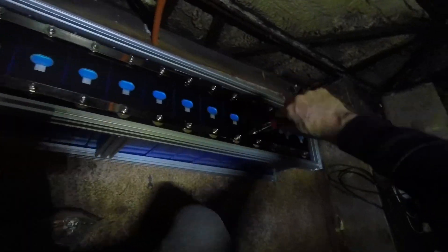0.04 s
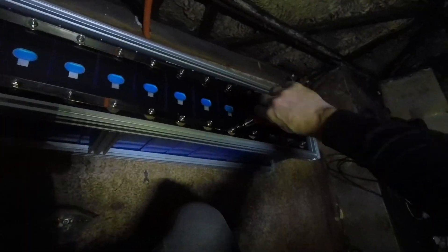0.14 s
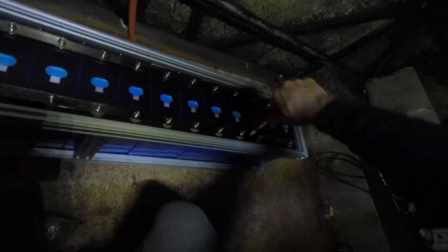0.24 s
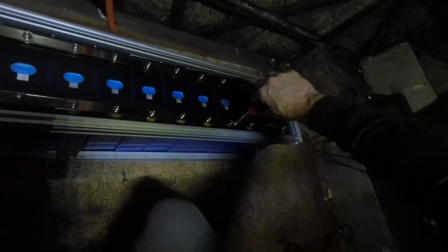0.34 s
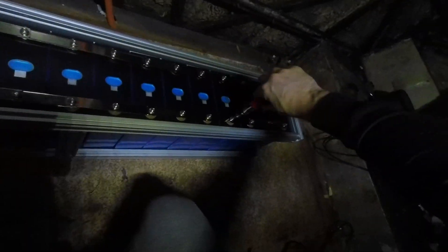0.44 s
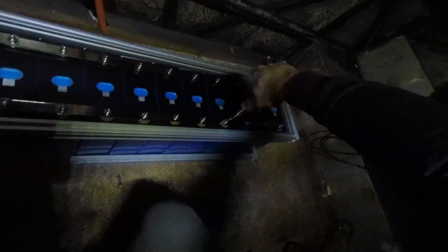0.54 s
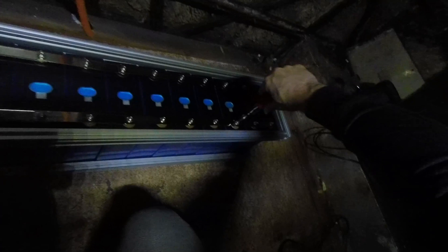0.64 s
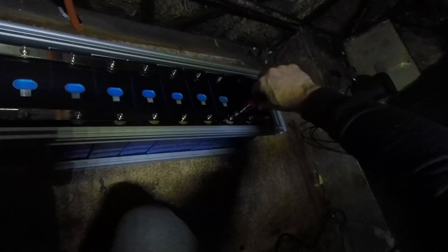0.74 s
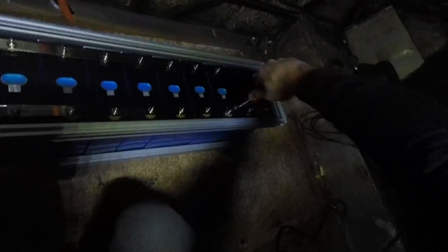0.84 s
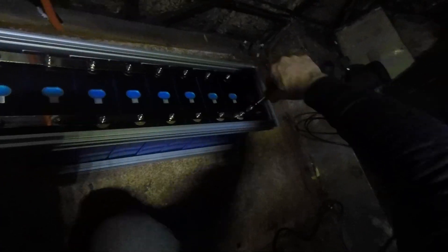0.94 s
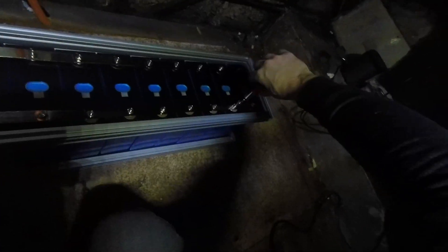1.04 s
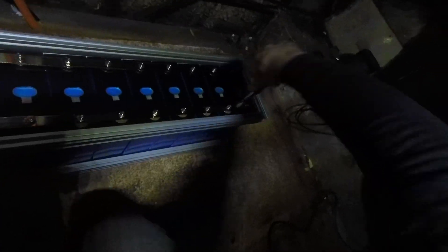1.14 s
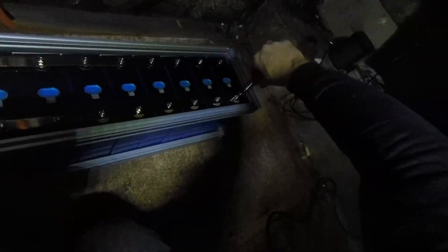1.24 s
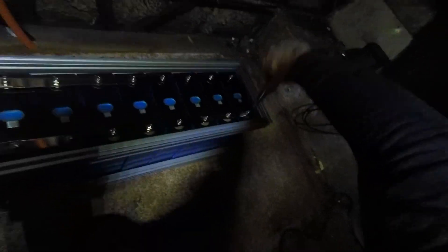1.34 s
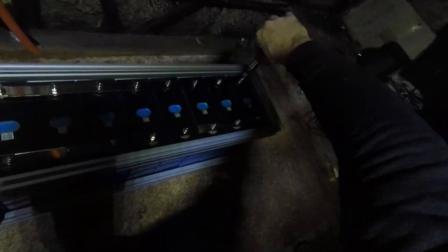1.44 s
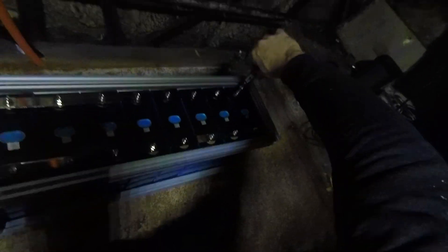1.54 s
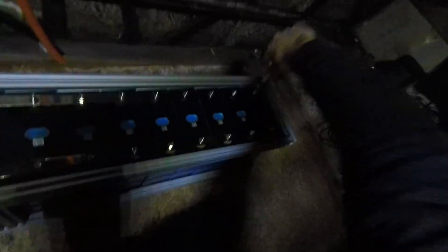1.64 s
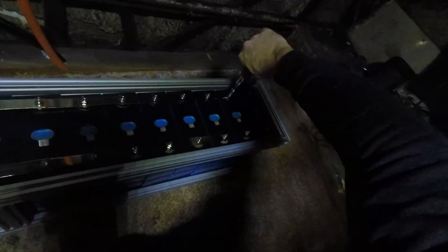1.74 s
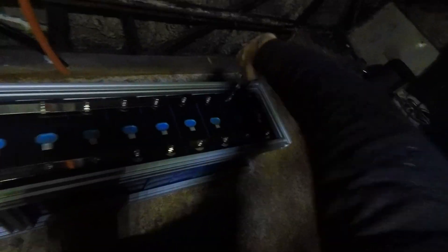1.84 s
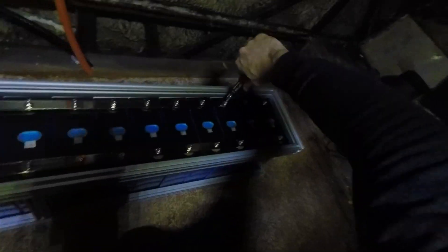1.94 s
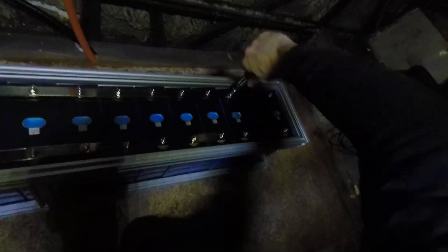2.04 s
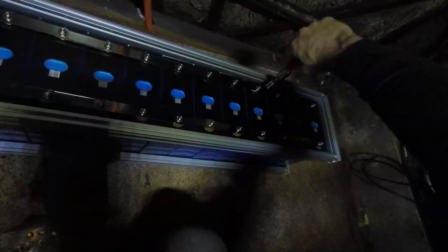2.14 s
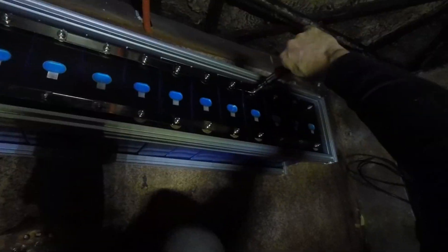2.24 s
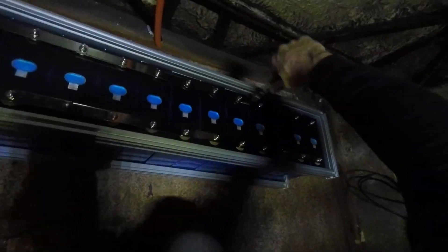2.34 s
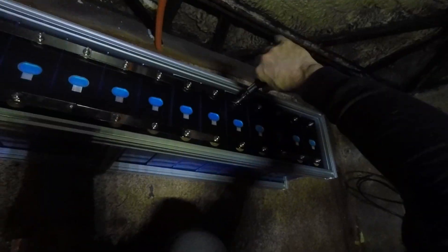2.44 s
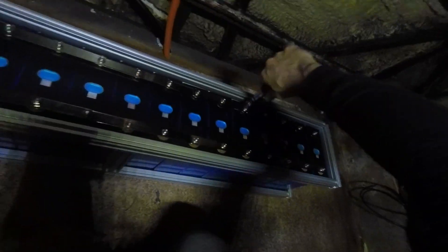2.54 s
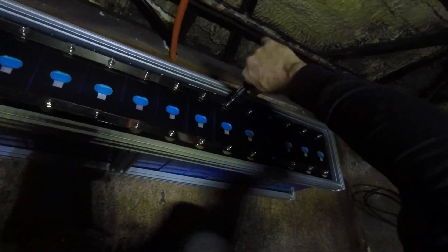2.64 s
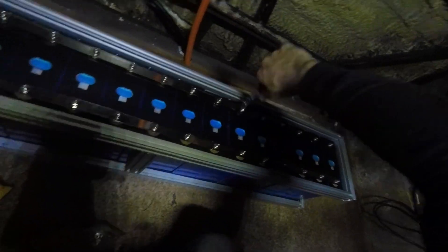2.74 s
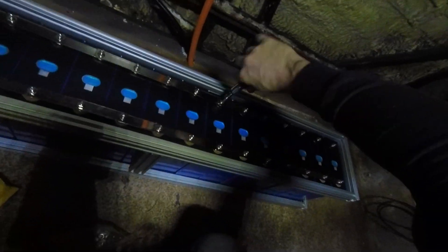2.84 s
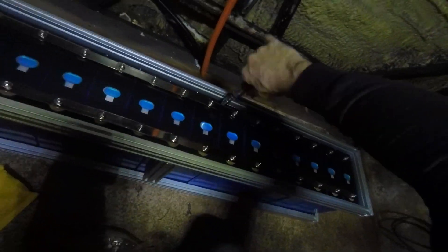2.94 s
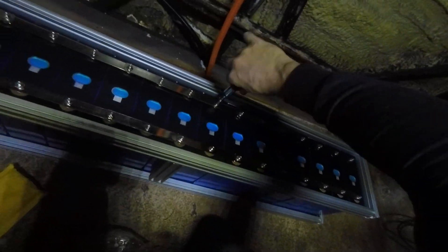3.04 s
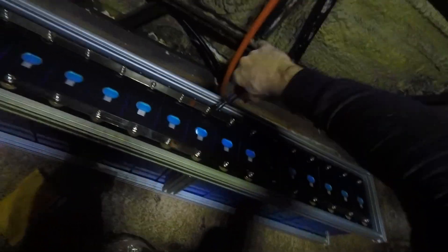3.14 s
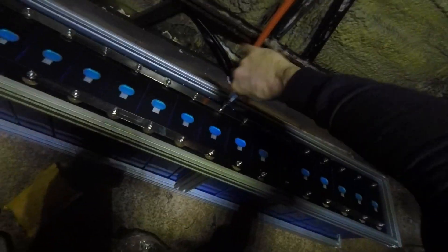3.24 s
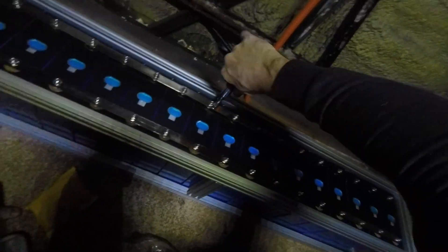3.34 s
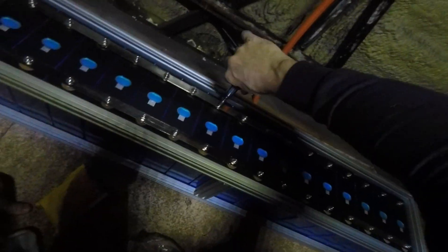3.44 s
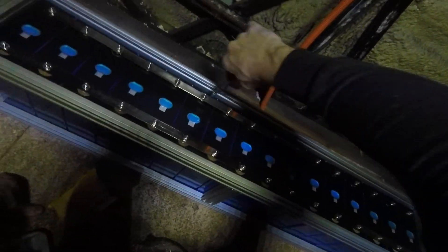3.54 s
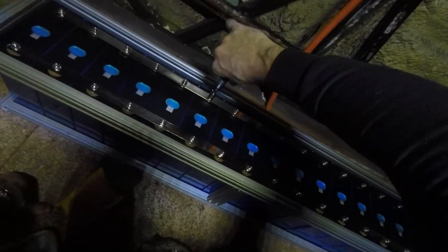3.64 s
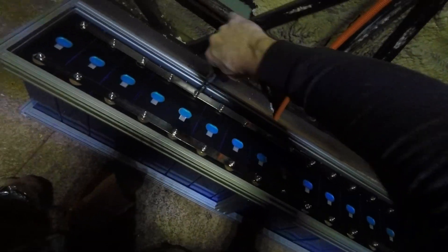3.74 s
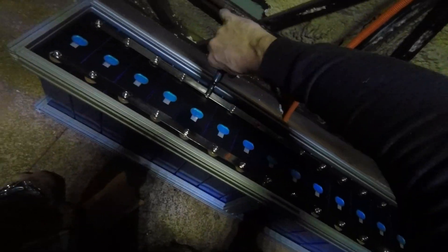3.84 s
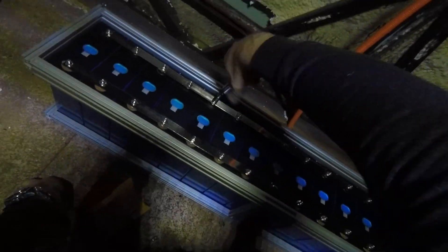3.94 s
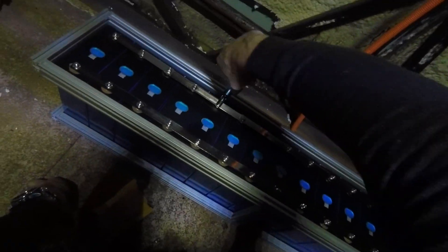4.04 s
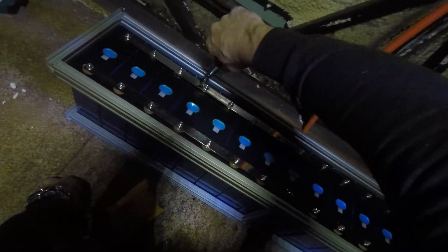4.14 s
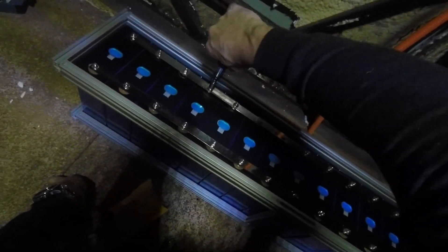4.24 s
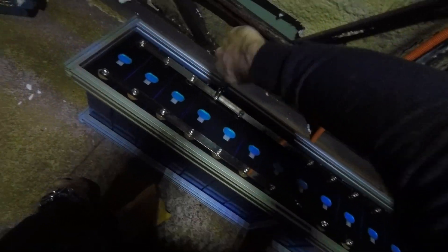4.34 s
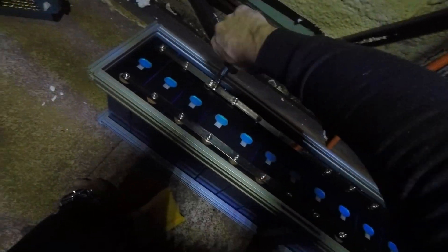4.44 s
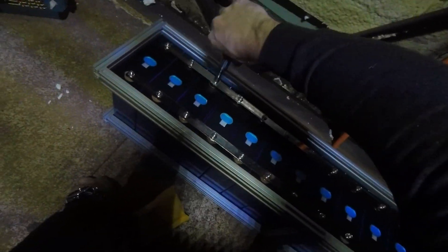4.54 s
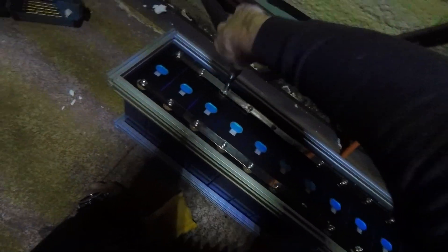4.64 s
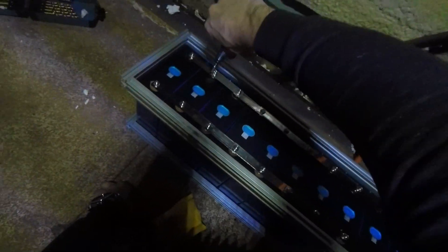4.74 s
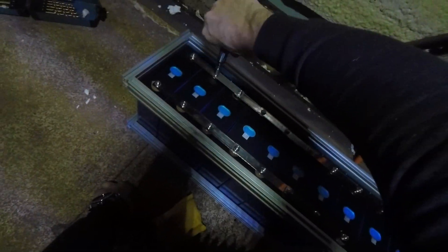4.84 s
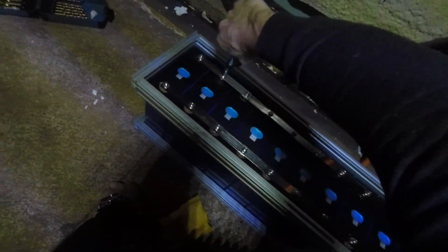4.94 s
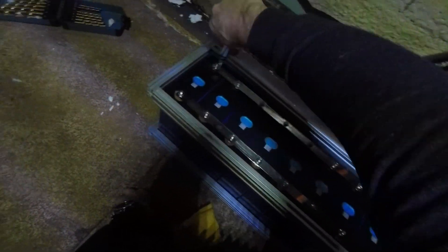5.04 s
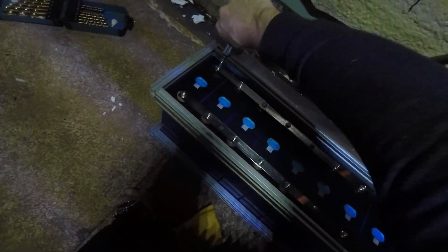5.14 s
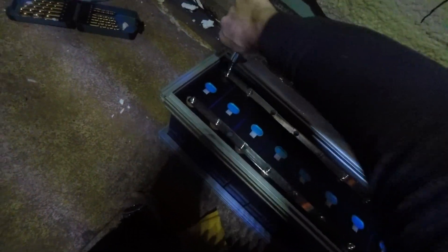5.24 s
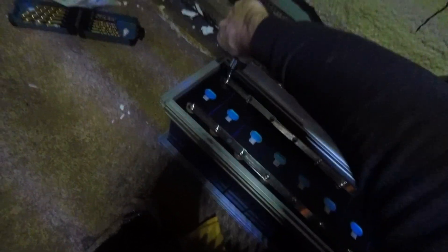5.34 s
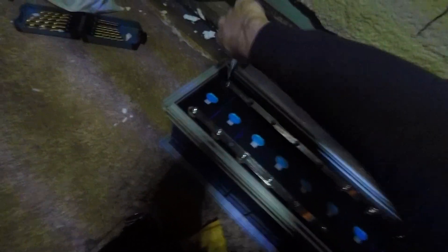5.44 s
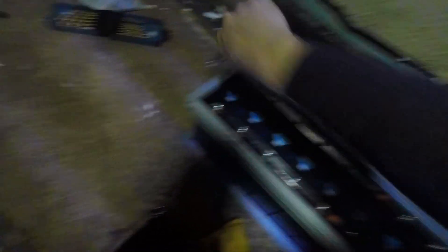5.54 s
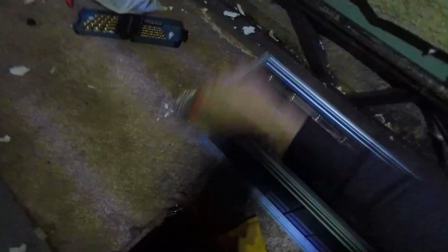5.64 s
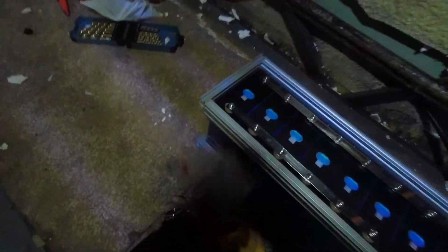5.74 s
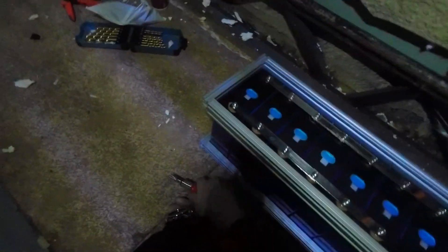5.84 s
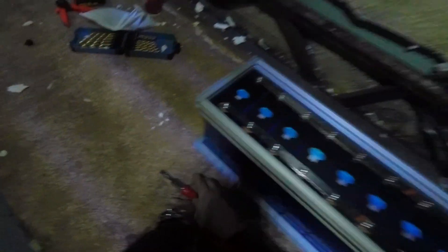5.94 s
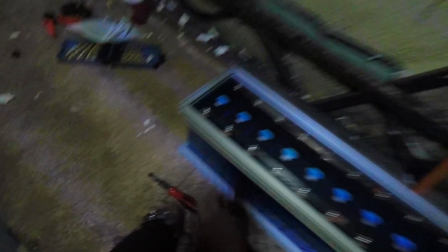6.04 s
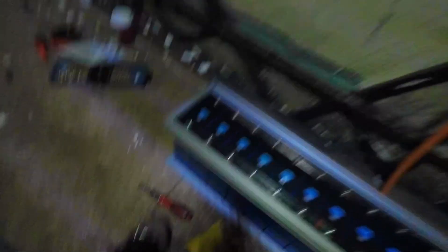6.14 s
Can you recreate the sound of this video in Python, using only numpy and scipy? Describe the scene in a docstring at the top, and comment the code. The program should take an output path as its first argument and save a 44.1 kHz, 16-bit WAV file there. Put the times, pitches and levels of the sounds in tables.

```python
"""Ratchet on a battery bank

A small hand ratchet swings back and forth on the terminal nuts: its pawl (the catch) and loose socket
click unevenly, and one joint creaks as it takes the load. A sleeve rustles, then something heavy knocks
against the case. The body-worn camera lets in more bass shortly before the knock, and its limiter
turns the sound down under the blow."""
import sys
import numpy as np
from scipy import signal
from scipy.fft import rfft, irfft, next_fast_len
from scipy.io import wavfile
from scipy.ndimage import uniform_filter1d, minimum_filter1d

SR = 44100
rng = np.random.default_rng(int(sys.argv[2]) if len(sys.argv) > 2 else 0)


def dump_mix(stems):
    """Bounce the given channels to the path in sys.argv[1] as a 16-bit WAV at rate SR."""
    frames = np.atleast_2d(stems).T  # one column per channel
    limited = np.clip(frames, -1, 1)  # hard clip at full scale
    pcm = np.round(limited * 32767).astype(np.int16)
    wavfile.write(sys.argv[1], SR, pcm)


N = 273670
TIME = np.arange(N) / SR
BASS_OPENS_S = 5.265


def from_db(db):
    """Turn decibels into a number to multiply by."""
    return 10 ** (np.asarray(db) / 20)


def rms_one(x):
    """Scale a sound so that its average strength (rms) is 1."""
    return x / np.sqrt(np.mean(x ** 2) + 1e-20)


def at_hz(points, hz):
    """Read between a table's rows, with octaves evenly spaced."""
    f, value = np.transpose(points)
    return np.interp(np.log(np.maximum(hz, 1)), np.log(f), value)


def add(out, s, sound):
    """Mix a sound in, starting at s seconds."""
    i = int(round(s * SR))
    out[i:i + len(sound)] += sound[:max(N - i, 0)]


def keep(x, hz, kind, order=2):
    """Keep the "low" side, the "high" side or a "band" of a sound."""
    sos = signal.butter(order, np.minimum(hz, .49 * SR), kind, fs=SR, output="sos")
    return signal.sosfilt(sos, x + 1e-18)


def noise(colour):
    """Steady noise with a given mix of bass and treble, rms 1."""
    size = next_fast_len(N)
    gain = from_db(at_hz(colour, np.arange(size // 2 + 1) * SR / size))
    return rms_one(irfft(rfft(rng.standard_normal(size)) * gain, size)[:N])


def resonate(x, tones, detune=0., vary_db=0.):
    """Ring an object's own tones; their pitch and strength can vary by chance."""
    out = 0
    for k, (hz, width, db) in enumerate(tones):
        decay = np.exp(-np.pi * width / SR)
        angle = 2 * np.pi * hz * (1 + detune * rng.normal()) / SR
        gain = (-1) ** k * from_db(db + vary_db * rng.normal()) * (1 - decay ** 2) / 2
        feedback = [1, -2 * decay * np.cos(angle), decay ** 2]
        out = out + gain * signal.lfilter([1, 0, -1], feedback, x + 1e-18)
    return out


# colours of the hush, the dull rubbing and the bright sliding: f/Hz, level/dB
HUSH_COLOUR = [(30, -26), (110, 13), (180, 17.5), (350, -4), (600, 0.5), (1000, -5.5), (2200, -12),
               (4300, -31), (7000, -10), (10000, -15.5), (12500, -24.5), (16000, -34)]
RUB_COLOUR = [(100, -8.5), (400, -9.5), (800, 3), (1150, -1.5), (1650, -5.5), (2200, -9.5), (3200, -15),
              (4500, -21), (9000, -47)]
SLIDE_COLOUR = [(1500, -20), (3200, 1), (4500, 0), (7000, -0.5), (10000, -3), (12500, -7.5), (15000, -9),
                (17000, -10)]
# the hand shifts its grip: middle t/s, half length/s, extra rubbing/dB, extra sliding/dB
GRIP_SHIFTS = [(.63, 0.083, 5, 2), (1.212, 0.22, 0.5, 1.5), (3.16, .13, 1, 5.5), (4.384, 0.11, 0.5, 1.5)]

def background():
    """Hand and cloth hiss on the handle; a hollower hush takes over once the bass is let in."""
    rub_db, slide_db = -50.5, -58.5
    for s, half_length, extra_rub_db, extra_slide_db in GRIP_SHIFTS:
        swell = np.exp(-((TIME - s) / half_length) ** 2)
        rub_db += extra_rub_db * swell
        slide_db += extra_slide_db * swell
    waver = rms_one(keep(rng.standard_normal(N), 22, "low"))
    rubbing = from_db(rub_db + 1.83 * waver) * noise(RUB_COLOUR)
    sliding = from_db(slide_db) * noise(SLIDE_COLOUR)
    hush = from_db(-46.5) * noise(HUSH_COLOUR)
    return np.where(TIME < BASS_OPENS_S, rubbing + sliding, hush)


def stroke(start_s, length_s, rise_s=.02, fade_s=0.033):
    """Loudness of one sleeve movement: rise, hold, then die away."""
    t = TIME - start_s
    return np.clip(t / rise_s, 0, 1) * np.exp(-np.maximum(t - length_s, 0) / fade_s)


# colour of the rustle: f/Hz, level/dB
SLEEVE_COLOUR = [(60, -25), (130, -2.5), (190, -11.5), (340, -3), (500, -13.5), (800, -19.5), (1300, -18),
                 (2500, -21), (5000, -32), (9000, -46)]
# the sleeve presses on the case: t/s, length/s, level/dB
SLEEVE_PRESSES = [(5.432, 0.06, -39.5), (5.512, 0.54, -46)]
# tones of the rubbed case: f/Hz, width/Hz, level/dB
RUBBED_TONES = [(1130, 56, -4.5), (1634, 100, 3.5), (3350, 210, -15), (4730, 190, -12.5)]

def sleeve():
    """Cloth drags in small uneven catches and, when pressed, rings the case."""
    drag = from_db(-51) * stroke(start_s=5.25, length_s=0.8)
    pressed = sum(from_db(db) * stroke(s, length) for s, length, db in SLEEVE_PRESSES)
    catches = rms_one(keep(rng.standard_normal(N), 47, "low"))
    ring = from_db(-5) * pressed * rms_one(resonate(rng.standard_normal(N), RUBBED_TONES))
    rustle = np.hypot(drag, pressed) * noise(SLEEVE_COLOUR)
    return from_db(0.78 * catches) * (rustle + ring)


# colour of the echo: f/Hz, level/dB
ECHO_COLOUR = [(60, -34), (130, -10.5), (250, 12), (600, 0.5), (1300, -8.5), (2500, -8), (5000, -18),
               (12000, -26)]
# how long it lasts: f/Hz, time to fade by 60 dB/s
ECHO_FADES = [(130, 0.36), (400, 0.19), (1500, 0.32), (4000, 0.2), (10000, .15)]

def workspace_echo():
    """The workspace answers a knock with a blur of echoes, the highest dying first."""
    t, echo = TIME[:SR // 2], 0
    for hz in 90 * 2 ** (np.arange(15) / 2):   # half-octave steps
        band = keep(rng.standard_normal(len(t)), [hz / 2 ** .25, hz * 2 ** .25], "band")
        echo += band * from_db(at_hz(ECHO_COLOUR, hz) - 60 * t / at_hz(ECHO_FADES, hz))
    echo *= np.minimum(t / 0.016, 1)
    return echo / np.linalg.norm(echo)


# blows on the case and its rocking afterwards: t/s, level/dB, dulled above f/Hz
KNOCKS = [(5.8814, 3.5, 3000), (5.883, 10.5, 340), (5.8983, 11, 1900), (5.9265, 5.5, 550), (5.9452, 2, 350),
          (5.974, 0.5, 262), (6.0051, 1.5, 148), (6.0494, -17, 250), (6.1104, -7, 170)]
# tones of the whole case: f/Hz, level/dB, time to fade by 60 dB/s
KNOCK_TONES = [(146.7, -32.5, 0.6), (189.7, -1.5, 0.08), (240.7, -21, 0.21), (274, -27.5, 0.12),
               (318, -33.5, 0.24), (378, -17.5, 0.064), (456, -11, 0.025), (575, -20, 0.06),
               (690, -13, 0.03), (800, -6.5, 0.012), (950, -9.5, 0.012), (1175, -9, 0.0097),
               (1275, -17.5, 0.024), (1350, -13.5, 0.021), (1726, -24, 0.071), (2300, -19, 0.016),
               (3150, -10, 0.01), (5620, -3, 0.0098), (8200, -14, 0.024)]

def knock():
    """A hard double blow rings the case, then softer bumps follow as it settles."""
    t, out = TIME[:SR // 2], np.zeros(N)
    body = sum(from_db(db - 60 * t / fade_s) * np.sin(2 * np.pi * hz * t)
               for hz, db, fade_s in KNOCK_TONES)
    for s, db, bright_hz in KNOCKS:
        crack = from_db(-3 - 60 * t / 0.031) * rng.standard_normal(len(t))
        blow = body + keep(crack, 7400, "low")
        add(out, s, from_db(db) * keep(blow, bright_hz, "low"))
    echo = signal.oaconvolve(keep(out, 403, "high"), workspace_echo())[:N]
    return out + from_db(-11.5) * echo


# faint squeaks during the creak: t/s, length/s, first f/Hz, last f/Hz, level/dB
SQUEAKS = [(0.54, 0.034, 8500, 11500, -45.5), (0.635, .035, 11000, 13300, -51),
           (0.632, 0.057, 7740, 11000, -46)]

def squeaks():
    """The dry screw thread whistles upward, unsteadily, as it is loaded."""
    out = np.zeros(N)
    for s, length, start_hz, end_hz, db in SQUEAKS:
        along = np.linspace(0, 1, int(length * SR))
        glide_hz = start_hz + (end_hz - start_hz) * np.sqrt(along)
        jitter_hz = 1500 * rng.standard_normal(len(along))
        whistle = np.sin(2 * np.pi * np.cumsum(glide_hz + jitter_hz) / SR)
        add(out, s, from_db(db) * np.sin(np.pi * along) * whistle)
    return out


# bursts of creaking: t/s, length/s, slip rate f/Hz, level/dB, unevenness from 0 to 1
CREAKS = [(0.524, 0.019, 200, -28, 0.2), (0.544, .027, 505, -25, 0.05), (0.603, .034, 262, -27.5, .06),
          (.638, .044, 460, -30, .2)]
# tones that each slip rings: f/Hz, width/Hz, level/dB
CREAK_TONES = [(800, 540, -1), (1010, 213, 3.5), (1207, 150, 0), (1526, 197, -1), (1980, 400, -21.5),
               (2650, 570, -30)]

def creak(rise_s=0.0034, fade_s=0.0097, slowing=.22):
    """The joint sticks and slips, slowing as the load takes hold; fast slips blend into a squeal."""
    slips = np.zeros(N)
    for start, length, slip_hz, db, uneven in CREAKS:
        t = 0
        for gap, size in rng.standard_normal((40, 2)):
            swell = np.clip(min((t + 1 / slip_hz) / rise_s, (length - t) / fade_s), 0, 1)
            rate = slip_hz * (1 - slowing * min(t / length, 1) ** 3)
            slips[int((start + t) * SR)] = swell * from_db(db + 9 * uneven * size) * np.sqrt(SR / rate)
            t += np.exp(uneven * gap) / rate
    tap = 1. * (TIME[:SR // 20] == 0)
    body = keep(resonate(tap, CREAK_TONES), 2200, "low", order=3)
    return from_db(1.5) * signal.oaconvolve(slips, body / np.linalg.norm(body))[:N]


def favour(tones, centre_hz, db_per_octave):
    """The spot that is hit rings the tones near one pitch hardest."""
    return [(hz, width, db - db_per_octave * abs(np.log2(hz / centre_hz))) for hz, width, db in tones]


def snap(tones, band_hz, rattle_db, rattle_s, room_db, room_s):
    """One part rings from a hit, a short rattle of loose steel and a faint room echo."""
    t = TIME[:SR // 14]
    fade = from_db(rattle_db - 60 * t / rattle_s) + from_db(room_db - 60 * t / room_s)
    force = (t == 0) + fade * rng.standard_normal(len(t))
    ring = resonate(force, tones, detune=0.014, vary_db=3.5)   # varies with the grip
    ring = keep(ring, band_hz, "band")
    return ring / np.sqrt(np.mean(ring[:SR // 100] ** 2))   # rms 1 over the first 10 ms


# tones of the four parts that a click rings: f/Hz, width/Hz, level/dB
CASE_TONES = [(750, 93, 11.5), (900, 465, -1), (1092, 80, 2), (1620, 1350, 2)]
HANDLE_TONES = [(2150, 254, -10), (2320, 390, -9), (3164, 395, 2.5), (3326, 330, 1.5), (3710, 880, -14)]
SOCKET_TONES = [(4720, 220, -1.1), (5420, 1180, -1.1), (6800, 970, 0.35), (8000, 730, 1), (9090, 1160, 2.2),
                (10300, 1600, 0.97)]
PAWL_TONES = [(11500, 800, -0.5), (14400, 4000, 1.2), (15430, 2700, 1.3)]
# the socket rings brighter on the later nuts: t/s, favoured f/Hz
SOCKET_PITCH = [(0, 6500), (1.5, 6000), (2.7, 7200), (5.25, 7730)]

def click(s, case_db, handle_db, pawl_db, case_hz):
    """One click rings the tool and, through the terminal, the battery case."""
    socket_hz = np.interp(s, *np.transpose(SOCKET_PITCH))
    case = snap(favour(CASE_TONES, case_hz, db_per_octave=26), [460, 3600],
                rattle_db=-30, rattle_s=0.019, room_db=-26.5, room_s=0.052)
    handle = snap(HANDLE_TONES, [1060, 5600], rattle_db=-24, rattle_s=0.04, room_db=-43, room_s=0.059)
    socket = snap(favour(SOCKET_TONES, socket_hz, db_per_octave=10), [3600, 10060],
                  rattle_db=-22.5, rattle_s=0.031, room_db=-44.5, room_s=0.091)
    pawl = snap(PAWL_TONES, [10300, 17600], rattle_db=-23, rattle_s=0.022, room_db=-56, room_s=.07)
    return (from_db(case_db + 0.87) * case + from_db(handle_db - 0.36) * handle
            + from_db(0.05) * socket + from_db(pawl_db - 0.4) * pawl)


def loose_ticks(clicks, chance=.45, soonest_s=.005, latest_s=0.033, weaker_db=13):
    """Slack in the tool adds a weaker tick after some clicks."""
    return [(s + soonest_s + (latest_s - soonest_s) * delay, db - weaker_db, *colour)
            for (s, db, *colour), (dice, delay) in zip(clicks, rng.random((len(clicks), 2)))
            if dice < chance]


def stray_ticks(until_s, per_s=7, case_db=-2, handle_db=-9.5, pawl_db=-5.5, case_hz=960):
    """Stray teeth slip at random moments between the clicks."""
    times = np.cumsum(rng.exponential(1, size=80)) / per_s
    levels_db = rng.normal(-50.5, 4, size=80)
    return [(s, db, case_db, handle_db, pawl_db, case_hz)
            for s, db in zip(times, levels_db) if s < until_s]


# the clear clicks: t/s, level/dB, case boost/dB, handle boost/dB, pawl boost/dB, case f/Hz
CLICKS = [(0.0993, -44, -10, 3.5, -10, 850), (0.105, -42.5, -8, -6, -9, 850),
          (0.124, -53, 9.5, -5, 3, 1190), (0.1406, -46, 4, 2, -7, 860), (0.3007, -39.5, 1, 6.5, -13, 1160),
          (0.318, -36, -2, 3, -8, 880), (0.3283, -38.5, -2, 2.5, -9, 960), (0.3464, -44, -10, -5, -4, 1200),
          (0.351, -38.5, -9, -12, -2, 1040), (0.4146, -39, -7, 0.5, -9, 990),
          (0.4245, -42.5, -5, 0, -7, 900), (0.4493, -47, -7, 3, -6, 1260), (0.488, -34, -2, 4.5, -9, 880),
          (0.6712, -43.5, 12, 4.5, 2, 940), (0.7515, -35, -6.5, 5.5, -4, 935),
          (0.8, -32.5, -7.5, -2.5, -4, 850), (0.8237, -44.5, -6, 0.5, -7, 1090),
          (0.9945, -44, -6, 2, -9, 1070), (1.0147, -43.5, -15, -2, -4, 830),
          (1.0578, -47.5, -3, -1.5, -5, 870), (1.2087, -40, 3.5, 6, -2, 1210),
          (1.226, -43.5, 1, 1, -13, 1230), (1.2453, -36.5, -1, 1, -8, 1090),
          (1.442, -32, -6, -7.5, -13, 1010), (1.4592, -40.5, -5, -5, -15, 1180),
          (1.4894, -33.5, -13, -17, -2, 820), (1.5026, -35.5, -13, -11, -4, 1050),
          (1.5142, -40, -12, -11, -11, 910), (1.5242, -43, -7, -9, -6, 860),
          (1.5576, -27, -6.5, -15.5, -5, 900), (1.7351, -35.5, -5.5, -3, -10, 1050),
          (1.7576, -37.5, -7.5, -1, -7, 1140), (1.7839, -38.5, -1.5, -9, -5, 990),
          (1.9607, -34, -4, -3.5, -9, 1170), (1.966, -32, -7.5, -3, -8, 990),
          (2.0085, -29, -0.5, -7, -10, 766), (2.185, -32, -4.5, -0.5, -12, 870),
          (2.2189, -40.5, -12, -3.5, -17, 1040), (2.2572, -39, 5, -3, -2, 850),
          (2.277, -44, 0, -7, -14, 890), (2.4088, -36.5, -4, 0.5, -9, 990), (2.423, -41, -12, -3, -7, 940),
          (2.4569, -30.5, -9, -3, -9, 1090), (2.6134, -37, -3, 2.5, -8, 750),
          (2.621, -39.5, -12, 4, -8, 990), (2.6544, -27, -10, -12, -12, 740),
          (2.7377, -46, -18, -6, 1, 1020), (2.802, -42, -4, -3, 0, 810), (2.834, -42, 1, 1.5, -4, 870),
          (2.8565, -30, -2.5, -4, -7, 800), (3.0135, -38, -14, 2, -5, 900),
          (3.0215, -40.5, -6, -6, -10, 880), (3.0646, -44, -1, -2.5, -13, 910),
          (3.18, -36, -5.5, 4, -3, 800), (3.2202, -28, -9.5, -10.5, -5, 850),
          (3.245, -43, -7, -2.5, -9, 1200), (3.2964, -45.5, -15, -15, -10, 1010),
          (3.3438, -34.5, -8, -8.5, -9, 860), (3.3591, -39, -5, -4, -7, 840),
          (3.4255, -36, -18, -5, -7, 820), (3.4319, -34.5, -0.5, -4, -17, 840),
          (3.4664, -39, -9, -6, -10, 820), (3.5821, -41.5, 0, 0.5, -4, 840),
          (3.612, -33.5, -3, -0.5, -4, 844), (3.6495, -43.5, 0, -4, -7, 870),
          (3.7708, -36, -6, -4, -13, 1090), (3.7765, -43.5, 1, -5, -10, 1090),
          (3.83, -39.5, -6, 1, -10, 1000), (3.864, -36, -5.5, -5, -5.5, 960),
          (4.0764, -47, -8, -19, -11, 820), (4.1253, -37, -2.5, 4, -4, 850), (4.142, -47, 1, 7, -9, 770),
          (4.1552, -39, -13, -21, -3, 800), (4.1637, -34, -7, -9, -10, 780),
          (4.1684, -27.5, -11.5, -14, -11, 780), (4.1897, -38, -8, -16, -8, 860),
          (4.2252, -38, -13, -3, -3, 1020), (4.2285, -38.5, -2, -3.5, 4, 1030),
          (4.278, -37, -9, -11, -9, 820), (4.353, -43, -15, -12, -6, 1100),
          (4.4414, -36, -3, -7.5, -3, 790), (4.451, -46, 8, 0, -6, 786), (4.5105, -41, -1, 2.5, -3, 820),
          (4.5538, -30, -3.5, -11, -6, 790), (4.5853, -42.5, -2, -2, -9, 840),
          (4.7251, -36.5, 1.5, 1, -5, 910), (4.741, -37.5, -5, -6, -8, 850),
          (4.7972, -35, -1, -4.5, -9, 830), (4.836, -30, -6.5, -4, -2.5, 780),
          (4.9166, -27.5, -3.5, -12.5, -6, 830), (5.047, -36.5, 3.5, -10.5, -8, 827),
          (5.1154, -41.5, 6.5, -3.5, -14, 830), (5.151, -37, 6, -9, -12, 770),
          (5.1583, -34, -3.5, -14, -5, 840), (5.1901, -28, 5, -9.5, -7.5, 810),
          (5.2145, -38.5, 2.5, -10, -15, 785), (5.3513, -38.5, -10, 2, -25, 1230)]

def ratchet():
    """The pawl and loose socket click as the handle swings, with fainter ticks in between."""
    out = np.zeros(N)
    ticks = loose_ticks(CLICKS) + stray_ticks(until_s=CLICKS[-1][0])
    for s, db, *colour in list(CLICKS) + ticks:
        add(out, s, from_db(db) * click(s, *colour))
    return out


def scene():
    """Everything as it reaches the camera, in one channel."""
    return (creak() + squeaks() + knock() + sleeve() + background() + ratchet())[None]


def cut_bass(x, hz, order):
    """Steeply remove the sound below hz, without delaying the rest."""
    return signal.sosfiltfilt(signal.butter(order, hz, "high", fs=SR, output="sos"), x)


def limiter(x, ceiling_db, recover_db_per_s):
    """The volume drops at once on a loud peak and creeps back."""
    over_db = np.maximum(20 * np.log10(np.abs(x) + 1e-9) - ceiling_db, 0)
    recovery_db = recover_db_per_s * TIME
    drop_db = np.maximum.accumulate(over_db + recovery_db) - recovery_db
    smooth_db = uniform_filter1d(minimum_filter1d(-drop_db, size=89), size=89)
    return x * from_db(smooth_db)


# colour of a faint steady rumble: f/Hz, level/dB
RUMBLE_COLOUR = [(20, -15), (45, -5), (85, -3), (150, -6.5), (300, -13.5), (600, -16.5), (2000, -50)]

def record(dry):
    """The camera goes from thin to full at a set time, adds rumble, limits peaks and trims the top."""
    opened = np.clip((TIME - BASS_OPENS_S) / 0.0094, 0, 1)
    thin = cut_bass(dry[0], 675, order=7) + from_db(-32) * dry[0]
    full = cut_bass(dry[0], 150, order=5) + from_db(-28.5) * dry[0]
    sound = (1 - opened) * thin + opened * full + from_db(-70) * noise(RUMBLE_COLOUR)
    sound = limiter(sound, ceiling_db=1.5, recover_db_per_s=40)
    sound = np.clip(sound, -1, 1)   # the loudest peaks still overload
    top_cut = signal.ellip(10, .3, 90, 16000, fs=SR, output="sos")   # above 16000 Hz
    return signal.sosfilt(top_cut, sound)[None]


dry = scene()
out = record(dry)
dump_mix(out)
```